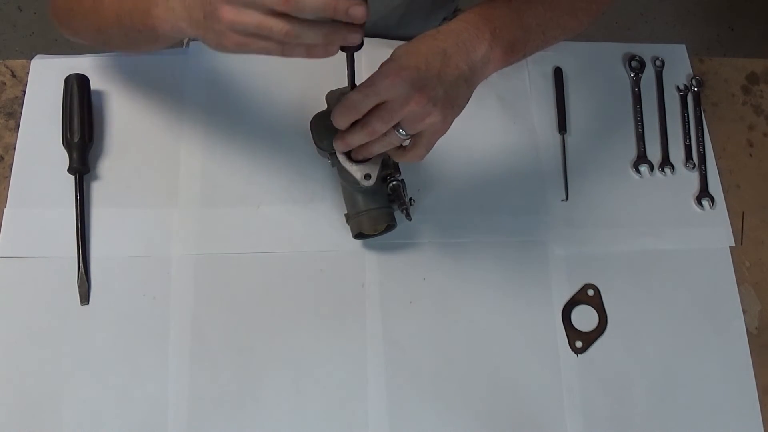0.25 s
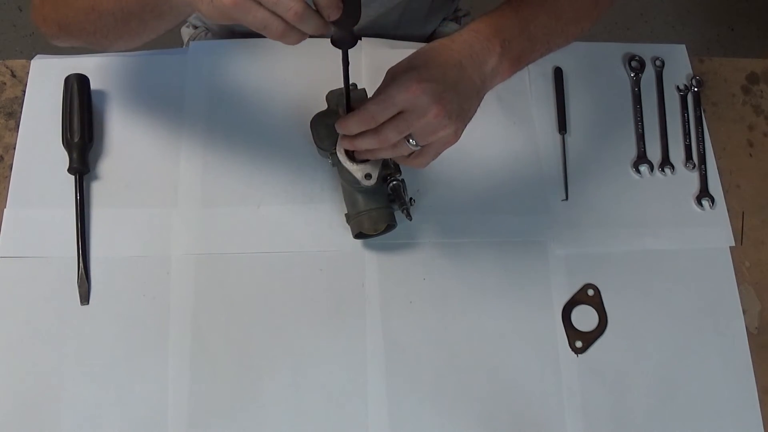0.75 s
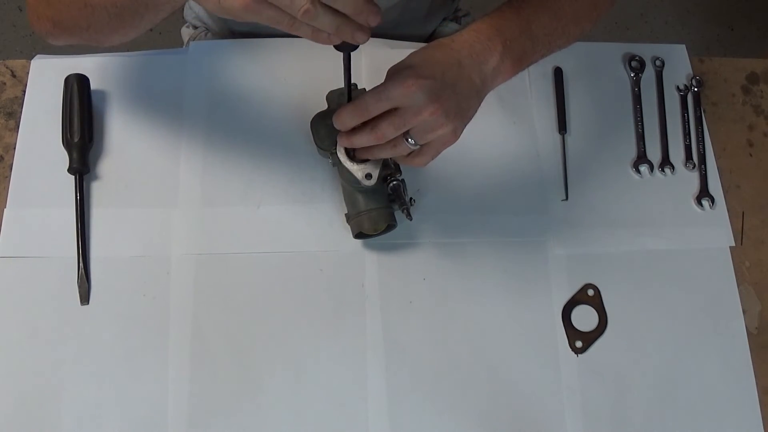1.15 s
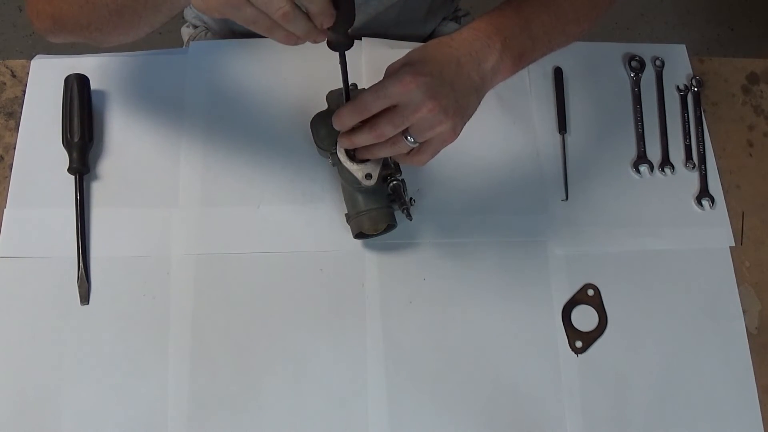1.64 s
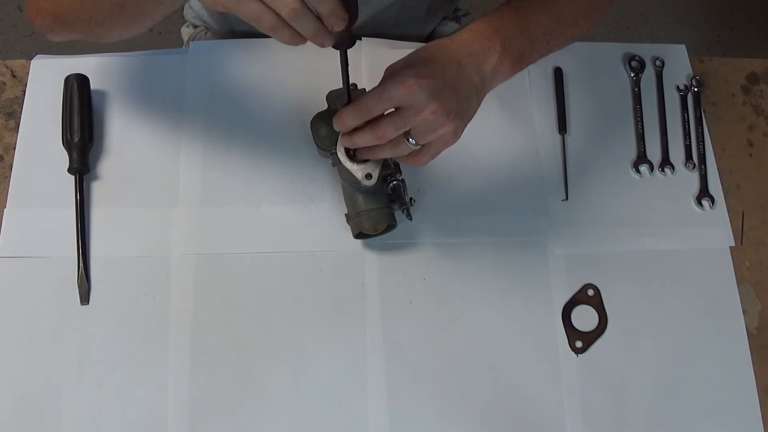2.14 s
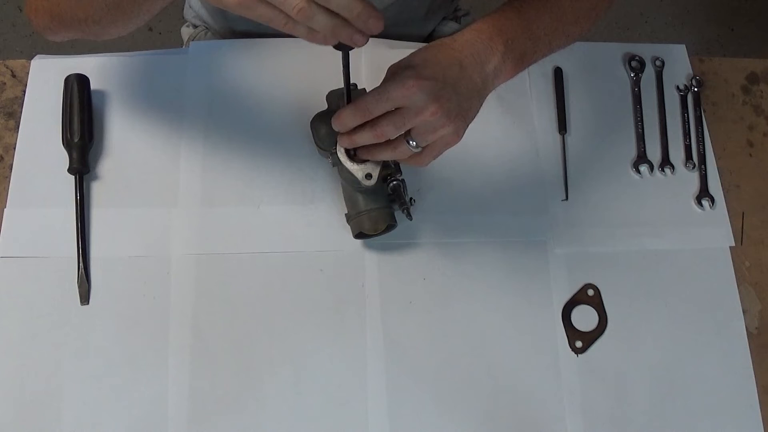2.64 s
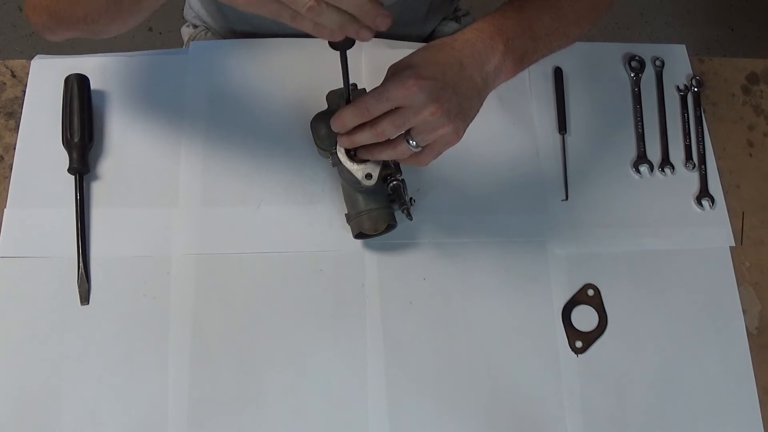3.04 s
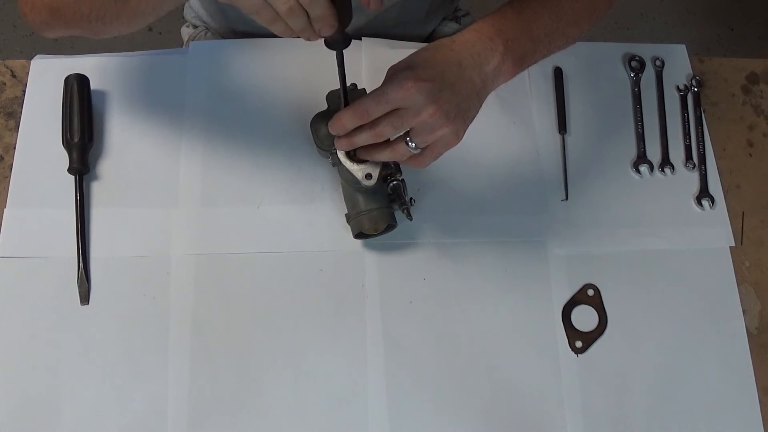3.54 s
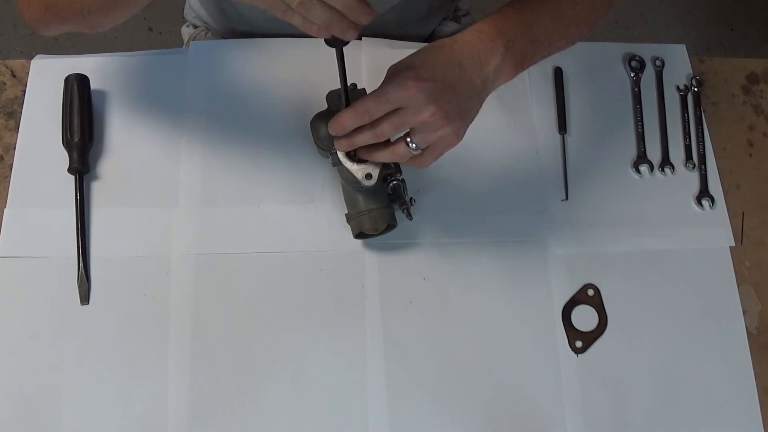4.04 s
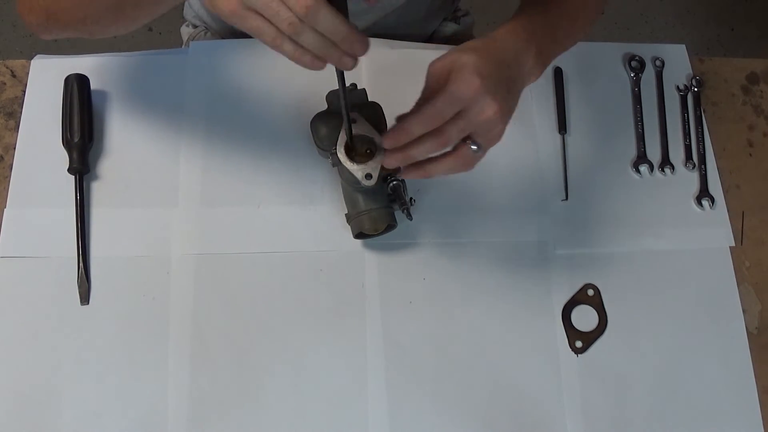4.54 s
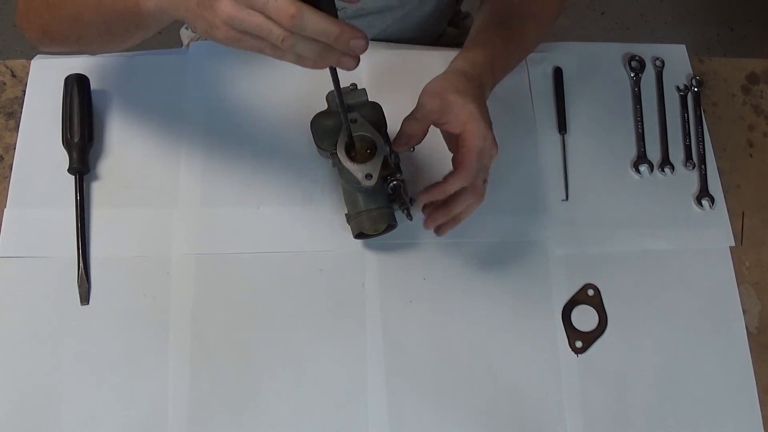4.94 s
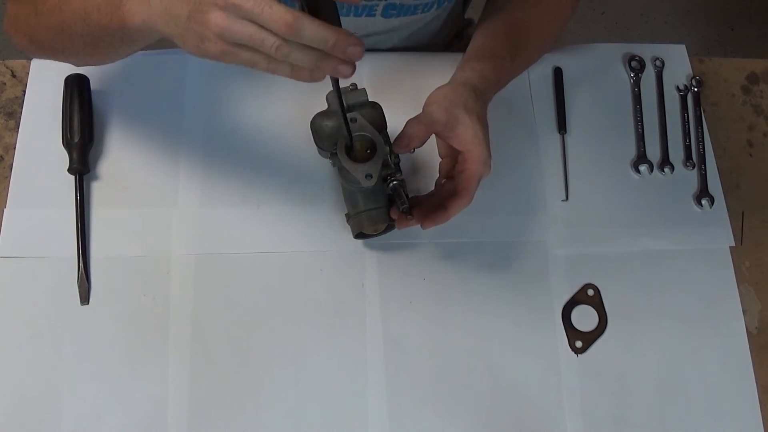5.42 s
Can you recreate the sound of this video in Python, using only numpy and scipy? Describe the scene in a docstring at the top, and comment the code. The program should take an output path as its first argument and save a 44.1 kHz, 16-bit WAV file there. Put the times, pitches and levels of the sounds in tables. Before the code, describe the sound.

Light, irregular metal taps and soft scrapes of a screwdriver working a screw, then one sharp slip, over faint steady room hum.

```python
"""Screwdriver in a carburettor

A screw is worked in a carburettor held on a paper-covered bench in a small workshop. Each impact excites
damped modes: the blade taps in the slot, the loose shank clinks, and near the end the steel slips with
one sharp snap. Friction at threads and fingertips makes a scrape. Bench top and walls reflect the blows.
Behind it all lie mains hum, room air and a faint fast ticking in the camera."""
import sys
import numpy as np
from scipy import signal
from scipy.fft import rfft, irfft, next_fast_len
from scipy.io import wavfile
from scipy.ndimage import uniform_filter1d, map_coordinates

SR = 44100
rng = np.random.default_rng(int(sys.argv[2]) if len(sys.argv) > 2 else 0)


def materialize(psi):
    """Save the field psi as 16-bit PCM at rate SR to the path in sys.argv[1].

    A 1-D psi becomes a single channel; in a 2-D psi each row is a channel.
    """
    bounded = np.clip(np.atleast_2d(psi).T, -1, 1)
    quanta = np.round(bounded * 32767).astype(np.int16)
    wavfile.write(sys.argv[1], SR, quanta)


N = 250488
T = np.arange(SR // 2) / SR  # time within one blow, in seconds

# Noise spectra, each relative within itself: frequency_hz, density_db
AIR_SPECTRUM = [(12, -37), (20, -20.5), (49, -1), (91, 0), (123, -0.5), (146, -9), (241, -10.5),
                (319, -12.5), (849, -15), (1860, -19), (2670, -21.5), (2990, -19), (3840, -23), (4420, -24),
                (16000, -61)]
HISS_SPECTRUM = [(1500, -17), (4000, -12), (6000, -1), (10500, -2), (15000, -4), (16000, -8)]
FRICTION_SPECTRUM = [(1500, 0), (3000, -11.5), (5700, -0.5), (7500, -4.5), (10500, -0.5), (12500, -8),
                     (16000, -20)]
CLINK_GRIT_SPECTRUM = [(400, -12), (700, -10), (1300, -13), (2200, -3.5), (3300, -4), (4300, -4),
                       (5800, -6), (8000, -5.5), (9500, 0), (11500, -11), (14000, -19), (16000, -28)]
SNAP_GRIT_SPECTRUM = [(80, -20), (200, -3), (450, -1.5), (800, -8), (1400, -12), (2400, -9), (3100, -2),
                      (4200, -9), (5800, 3), (7300, -2), (8500, 1), (10400, 2.5), (13500, -1), (16000, -15)]
SNAP_RADIATED_SPECTRUM = [(100, -19), (420, -1), (800, -8), (1500, -8.5), (2300, -3.5), (3100, -1.5),
                          (4200, -3.5), (5800, -0.5), (7400, 1), (8500, -2.5), (10300, 3.5), (11800, -3),
                          (13500, -6), (16000, -19)]  # sent towards bench top and walls
TAP_CRACK_SPECTRUM = [(2500, -9.5), (4000, 1), (5600, 4.5), (7500, -1.5), (10000, -2), (12500, -16),
                      (16000, -36)]
CASTING_SPECTRUM = [(300, -22.5), (800, 6), (1300, -9), (2000, 0), (3200, -2), (4200, -30), (8000, -52)]  # the casting's many small modes

# Left-right likeness of room air and of wall reflections: frequency_hz, coherence_ratio
AIR_COHERENCE = [(60, 1.0), (150, 0.99), (380, 0.49), (950, 0.076), (2380, 0.15), (5980, 0.79),
                 (15000, 1.0)]
WALL_COHERENCE = [(150, 0.99), (500, 1), (1500, 1), (3500, 0.78), (7000, 1), (11000, 1)]
# Reverberation time of the workshop: frequency_hz, t60_s
ROOM_DECAY = [(150, 0.3), (500, 0.62), (3000, 0.48), (7000, 0.47), (11000, 0.3), (15000, 0.12)]
# Colour of the reflections from walls and bench top: frequency_hz, gain_db
WALL_COLOUR = [(120, 8), (400, 7.5), (1200, 3.5), (3000, 1.5), (7000, -1), (11000, -4.5), (15000, 7)]
BENCH_COLOUR = [(200, -25), (700, 9), (3500, -1), (7500, -14), (10000, -16)]
# How differently the two microphones hear a close blow: frequency_hz, side_gain_db
SIDE_RESPONSE = [(150, -44), (600, -36), (3500, -22.5), (7200, -18), (9000, -32), (13000, -19)]

# Partials of the mains hum: pitch_hz, rms_level_db
HUM_PARTIALS = [(119.8, -55), (240, -71), (447, -69), (872, -72)]
# Modes of the camera's tick: pitch_hz, level_db, attack_s, t60_s
TICK_MODES = [(2660, -41, 0.00032, 0.011), (3790, -41, 0.0029, 0.027)]
# Modes of bench, shank and casting: pitch_hz, relative_level_db, t60_s
BENCH_MODES = [(122.5, -10.5, 0.18), (185, 0, 0.09), (274, -1.5, 0.088), (403, -0.5, .08),
               (481, -2.5, 0.069), (628, -0.5, 0.015), (885, 0.5, 0.033), (1058, -6, 0.031)]
SHANK_MODES = [(3070, 4.5, 0.049), (3696, 0.5, 0.038), (4550, -12, .05), (5570, 1, 0.039),
               (5716, 4.5, 0.036), (6240, -2.5, .045), (7000, -17, .04), (8830, 2, 0.073), (9230, 1, .05),
               (10000, -8, 0.026), (11230, -18, .14), (12800, -16, .04), (14200, -15, .05)]
CASTING_MODES = [(190, -24.5, 0.13), (271, -36, 0.058), (424, -19, 0.088), (1036, -19, 0.037),
                 (1645, -18, 0.039), (2082, -20.5, 0.031), (3090, -18, .05), (3655, -24, 0.05),
                 (5660, -2.5, 0.024), (6330, -23, 0.024), (7090, 0.5, 0.019), (7420, -2, 0.017),
                 (8860, -12, 0.018), (9500, -18, 0.02), (10370, 2.5, 0.022), (11260, -13, 0.018),
                 (12260, -15, 0.017), (13400, -10, .02)]

# Sliding strokes of fingers and threads: centre_s, length_s, level_db
FRICTION_STROKES = [(1.04, .04, -59), (2.024, .07, -61), (2.553, 0.064, -57), (2.95, 0.11, -63),
                    (3.297, .07, -56.5), (3.52, 0.14, -52.5), (3.64, 0.057, -62), (3.86, 0.076, -53.5),
                    (4.16, 0.057, -49.5), (4.387, .05, -56), (4.506, 0.056, -52.5), (4.81, 0.066, -52),
                    (4.9, 0.044, -60.5), (5.008, 0.12, -49.5), (5.137, 0.055, -54), (5.385, 0.097, -49.5),
                    (5.514, 0.14, -57), (5.666, 0.079, -49.5)]
# Rattles of the shank against the screw: start_s, relative_level_db, relative_thud_db, relative_treble_db
SHANK_RATTLES = [(0.8015, -31.5, -46, -13), (1.9284, -27, -41, -12), (2.7858, -22.5, -42.5, -10.5),
                 (3.1514, -24.5, -36.5, -12), (3.471, -27.5, -37.5, -12.5), (3.7874, -26, -39.5, -11)]
# Contacts of the blade skidding over the casting: start_s, level_db
SKID_CONTACTS = [(5.1977, -13.5), (5.1995, -14), (5.2009, -27), (5.204, -22)]
# Blows of the blade in the slot, damped by the hand: start_s, blade_db, blade_hz, relative_casting_db,
# casting_hz, thud_db, hardness_db_per_octave, crack_db, blade_t60_s
BLADE_TAPS = [(0.3119, -28, 3280, -47.5, 2090, -35, -5, -38, 0.03),
              (0.386, -41, 3270, -45, 1630, -49, 5, -44, 0.022),
              (0.401, -33, 3230, -48, 1590, -32, -2, -36.5, 0.028),
              (0.498, -49, 3300, -49, 1630, -57, 0, -54, 0.02),
              (0.592, -38, 3230, -56, 1810, -37, 1.5, -47, 0.042),
              (1.212, -49, 3200, -49, 1630, -34.5, 1, -60, 0.02),
              (1.388, -41, 3180, -44, 2150, -34.5, 5, -52, 0.037),
              (1.5413, -40, 3170, -47, 1610, -45, 5, -55, 0.032),
              (1.5441, -27, 3153, -34.5, 1596, -34, 1, -39.5, 0.029),
              (2.349, -54, 3090, -49, 1900, -54, 5, -52, 0.029),
              (2.385, -47, 3100, -48, 1740, -47.5, 2, -61, 0.02),
              (2.563, -45, 3720, -51, 2110, -55, 7, -47, 0.032),
              (2.628, -55, 2850, -44, 1630, -41.5, 2.5, -59, 0.02),
              (2.7435, -40.5, 2700, -38.5, 915, -53, 5, -37, 0.02),
              (3.119, -59, 2690, -55, 1660, -51, 7, -52, 0.02),
              (3.4317, -27, 3000, -34, 1790, -47, 3, -51, 0.012),
              (3.7495, -46, 3090, -45.5, 2100, -48, -1, -43, 0.02),
              (3.7546, -35.5, 3090, -43.5, 2120, -46, -7, -46, 0.018),
              (4.06, -38.5, 3200, -50, 1740, -46.5, 13, -42, 0.024),
              (4.101, -62, 3170, -42.5, 1670, -58, 10, -45, 0.022),
              (4.3768, -26.5, 2860, -37.5, 2280, -42, -3.5, -47, 0.012),
              (4.4193, -28, 3070, -48, 1600, -46.5, 3, -46, 0.016),
              (4.6805, -29.5, 2446, -37.5, 1720, -40.5, 1.5, -36, 0.04),
              (4.7291, -37, 2520, -40, 1600, -48, 2, -40, 0.033),
              (4.9524, -51, 2900, -57, 2150, -52, 1, -42, 0.02),
              (5.057, -41, 3200, -45, 1790, -44, -6, -45.5, 0.015),
              (5.108, -60, 2570, -42, 1930, -63, 1, -64, 0.02),
              (5.162, -64, 2560, -62, 1840, -45, -3, -42, 0.02),
              (5.4024, -62, 3110, -53, 1870, -62, -2, -38.5, 0.02),
              (5.5789, -51, 3530, -47, 1610, -48, -5, -41, 0.025)]


def amp(db):
    """Amplitude grows tenfold for every 20 dB."""
    return 10 ** (np.asarray(db) / 20)


def unit(x):
    """Normalisation to an rms of 1."""
    return x / np.sqrt(np.mean(x ** 2) + 1e-20)


def unit_peak(x):
    """Normalisation of a transient: its loudest 4 ms have an rms of 1."""
    return x / np.sqrt(uniform_filter1d(x ** 2, 176).max() + 1e-20)


def along(points, hz):
    """Interpolation of (frequency_hz, value) points on a logarithmic frequency axis."""
    frequencies, values = np.transpose(points)
    return np.interp(np.log(hz + 1), np.log(frequencies + 1), values)


def filtered(x, response):
    """Linear filtering multiplies the spectrum by a frequency response."""
    n = x.shape[-1]
    padded = next_fast_len(n + SR // 4)
    return irfft(rfft(x, padded) * response(np.fft.rfftfreq(padded, 1 / SR)), padded)[..., :n]


def add(track, start_s, x):
    """Superposition: x adds to the track from start_s on."""
    part = track[..., round(start_s * SR):][..., :x.shape[-1]]
    part += x[..., :part.shape[-1]]


def wobble(rate_hz):
    """Random modulation: a smooth curve through rate_hz random knots a second."""
    knots = rng.standard_normal(int(N * rate_hz / SR) + 4)
    return map_coordinates(knots, [np.arange(N) * rate_hz / SR])


def noise(spectrum, size):
    """Spectral shaping turns white noise into coloured noise of rms 1."""
    return unit(filtered(rng.standard_normal(size), lambda hz: amp(along(spectrum, hz))))


def diffuse(pair, coherence):
    """A diffuse field is partly coherent at two close microphones; two unrelated signals mix to form it."""
    def weights(hz):
        angle = np.arccos(np.clip(along(coherence, hz), -1, 1)) / 2
        return np.array([np.cos(angle), np.sin(angle)])
    mid, side = filtered(pair, weights)
    return np.array([mid + side, mid - side])


def fade(attack_s, t60_s):
    """Damping: after a quick rise, the amplitude falls exponentially by 60 dB in t60_s."""
    return (1 - np.exp(-T / attack_s)) * np.exp(-np.log(1000) * T / t60_s)


def ring(modes, attack_s, scatter_db):
    """Free vibration is a sum of damped modes; neighbours start in antiphase, and strengths scatter."""
    out = np.zeros(len(T))
    for k, (hz, db, t60_s) in enumerate(modes):
        strength = (-1) ** k * amp(db + scatter_db * rng.normal())
        out += strength * fade(attack_s, t60_s) * np.sin(2 * np.pi * hz * T)
    return unit_peak(out)


def burst(spectrum, attack_s, t60_s):
    """Rough contacts and dense modes are heard as decaying noise."""
    return unit_peak(noise(spectrum, len(T)) * fade(attack_s, t60_s))


def background():
    """Room air forms a diffuse field, joined by hiss and mains hum that wavers in level and phase."""
    t = np.arange(N) / SR
    air_pair = np.array([noise(AIR_SPECTRUM, N), noise(AIR_SPECTRUM, N)])
    air = amp(-48.5) * unit(diffuse(air_pair, AIR_COHERENCE))
    hiss = amp(-57.5) * noise(HISS_SPECTRUM, N)
    hum = np.zeros(N)
    for hz, db in HUM_PARTIALS:
        amplitude = np.sqrt(2) * amp(db + 1.4 * wobble(3.08))
        hum += amplitude * np.sin(2 * np.pi * hz * t + 0.12 * wobble(5.1))
    return air + hiss + hum


def camera_tick(rate_hz=30000 / 1001):
    """Periodic excitation: two damped modes in the camera ring about thirty times a second."""
    out = np.zeros(N)
    tick = sum(amp(db) * fade(attack_s, t60_s) * np.sin(2 * np.pi * hz * T)
               for hz, db, attack_s, t60_s in TICK_MODES)
    for start_s in np.arange(0.0109, N / SR, 1 / rate_hz):
        add(out, start_s, amp(0.8 * rng.normal()) * tick)
    return out


def wall_response(gain_db):
    """Reverberation: dense reflections die away at a rate that depends on frequency."""
    hz, t, spectra = signal.stft(rng.standard_normal((2, SR * 2 // 3)), SR, nperseg=256)
    decay = np.exp(-np.log(1000) * t / along(ROOM_DECAY, hz)[:, None])
    tail = signal.istft(spectra * decay, SR, nperseg=256)[1]
    tail *= amp(gain_db) / np.linalg.norm(tail[0])
    return diffuse(filtered(tail, lambda f: amp(along(WALL_COLOUR, f))), WALL_COHERENCE)


def bench_response(gain_db, t60_s):
    """Early reflections from the bench top form a short, coloured impulse response."""
    early = rng.standard_normal((2, len(T))) * fade(0.00064, t60_s)
    early *= amp(gain_db) / np.linalg.norm(early[0])
    return filtered(early, lambda hz: amp(along(BENCH_COLOUR, hz)))


def in_room(direct, radiated, wall_gain_db, bench_gain_db, bench_t60_s):
    """Direct sound adds to the radiated sound convolved with the reflections of bench top and walls."""
    walls = wall_response(wall_gain_db)
    bench = bench_response(bench_gain_db, bench_t60_s)
    side = filtered(direct, lambda hz: 1j * amp(along(SIDE_RESPONSE, hz)))  # in quadrature
    out = np.zeros((2, SR))
    add(out, 0, np.array([direct + side, direct - side]))
    add(out, 0, signal.fftconvolve(radiated[None], bench, axes=1))
    add(out, 0.004, signal.fftconvolve(radiated[None], walls, axes=1))
    return out


def scrape():
    """Sliding friction of threads and fingertips makes short strokes of noise with an uneven grain."""
    t = np.arange(N) / SR
    strokes = sum(amp(db) * np.exp(-2 * ((t - centre_s) / length_s) ** 2)
                  for centre_s, length_s, db in FRICTION_STROKES)
    friction = noise(FRICTION_SPECTRUM, N)
    grain = amp(2.5 * wobble(840) + 1.9 * wobble(60))
    return strokes * unit(friction * grain)


def bench_thud(hardness_db_per_octave):
    """The casting transmits a blow to the bench; a harder contact tilts the modes upward, up to 500 Hz."""
    modes = [(hz, db + hardness_db_per_octave * np.log2(min(hz, 500)), t60_s)
             for hz, db, t60_s in BENCH_MODES]
    return ring(modes, attack_s=0.0041, scatter_db=0.5)


def shank_chatter(gap_s=0.002, drop_db=3):
    """Interference between three uneven bounces reinforces some modes and cancels others."""
    out = np.zeros(len(T))
    for k in range(3):
        start_s = k * gap_s * rng.uniform(0.8, 1.2)
        add(out, start_s, amp(-k * drop_db) * ring(SHANK_MODES, attack_s=0.0005, scatter_db=0.5))
    return unit_peak(out)


def shank_clinks():
    """Let go between turns, the shank bounces on the screw and rings freely; harder contact is brighter."""
    out = np.zeros((2, N))
    for start_s, db, thud_db, treble_db in SHANK_RATTLES:
        contact = lambda hz: amp(db + along([(6000, 0), (9000, treble_db + 8.5)], hz))
        steel = amp(-6.5) * filtered(shank_chatter(), contact)
        grit = amp(-6) * filtered(burst(CLINK_GRIT_SPECTRUM, attack_s=0.0009, t60_s=0.046), contact)
        knock = grit + amp(thud_db - 3) * bench_thud(hardness_db_per_octave=1.6)
        radiated = amp(-5) * steel + knock
        clink = in_room(steel + knock, radiated, wall_gain_db=-8.5, bench_gain_db=-10, bench_t60_s=0.07)
        add(out, start_s, clink)
    return out


def blade_ring(hz, t60_s):
    """The blade's main mode lies between two weaker ones; the grip varies their strengths."""
    modes = [(hz * 0.87, -9, t60_s * 0.54), (hz, 0, t60_s), (hz * 1.13, -14, t60_s * 1.6)]
    return ring(modes, attack_s=0.0003, scatter_db=2)


def blade_taps():
    """Impact excitation: seating in the slot, the blade rings and knocks the casting against the bench."""
    out = np.zeros((2, N))
    for start_s, blade_db, blade_hz, casting_db, casting_hz, thud_db, hardness, crack_db, t60_s in BLADE_TAPS:
        blade = amp(blade_db) * blade_ring(blade_hz, t60_s)
        casting = amp(casting_db - 1) * ring([(casting_hz, 0, 0.022)], attack_s=0.0008, scatter_db=0)
        # a blow that reaches the bench also shakes the casting's many small modes
        shake_db = (casting_db + thud_db) / 2 - 2
        casting += amp(shake_db) * burst(CASTING_SPECTRUM, attack_s=0.00067, t60_s=0.053)
        crack = amp(crack_db) * burst(TAP_CRACK_SPECTRUM, attack_s=0.00023, t60_s=0.024)
        knock = casting + crack + amp(thud_db) * bench_thud(hardness)
        radiated = amp(-2.5) * blade + knock
        tap = in_room(blade + knock, radiated, wall_gain_db=-10, bench_gain_db=-13.5, bench_t60_s=0.13)
        add(out, start_s, tap)
    return out


def blade_snap():
    """The blade slips and skids over the casting, whose ring is directional, aimed at the microphones."""
    start_s = SKID_CONTACTS[0][0]
    casting = amp(-9.5) * ring(CASTING_MODES, attack_s=0.0008, scatter_db=1)
    grit = np.zeros(len(T))
    for contact_s, db in SKID_CONTACTS:
        add(grit, contact_s - start_s, amp(db) * burst(SNAP_GRIT_SPECTRUM, attack_s=0.00043, t60_s=0.018))
    # contact noise reaches the walls from all sides of the casting
    chatter = amp(-13.5) * burst(SNAP_RADIATED_SPECTRUM, attack_s=0.00073, t60_s=0.025)
    radiated = amp(-12.5) * casting + chatter
    snap = in_room(casting + grit, radiated, wall_gain_db=-5.5, bench_gain_db=-7.5, bench_t60_s=0.092)
    out = np.zeros((2, N))
    add(out, start_s, snap)
    return out


def scene():
    """The sources superpose, with all the work straight in front of the microphones."""
    return blade_taps() + shank_clinks() + blade_snap() + scrape() + camera_tick() + background()


def record(dry, ceiling=0.88, top_hz=16000):
    """The loudest peaks are gently rounded below the ceiling, and the camera's band limit removes all above
    top_hz."""
    rounded = dry / (1 + np.abs(dry / ceiling) ** 6) ** (1 / 6)
    return filtered(rounded, lambda hz: hz < top_hz)


dry = scene()
out = record(dry)
materialize(out)
```